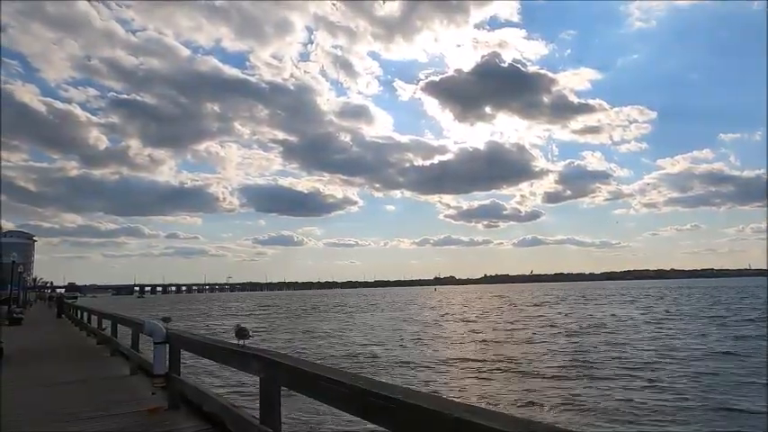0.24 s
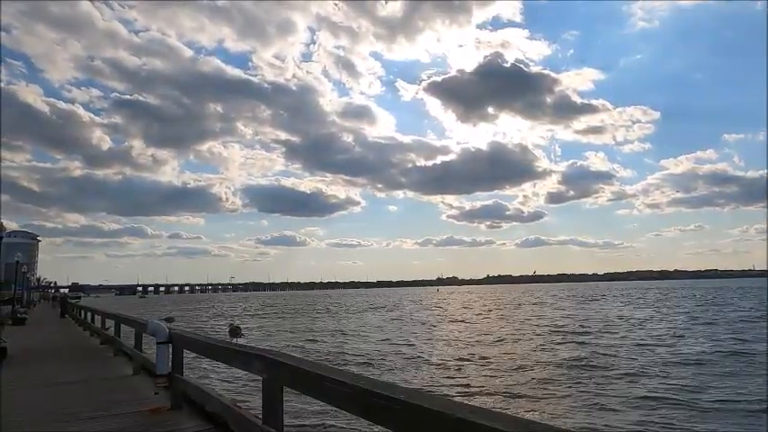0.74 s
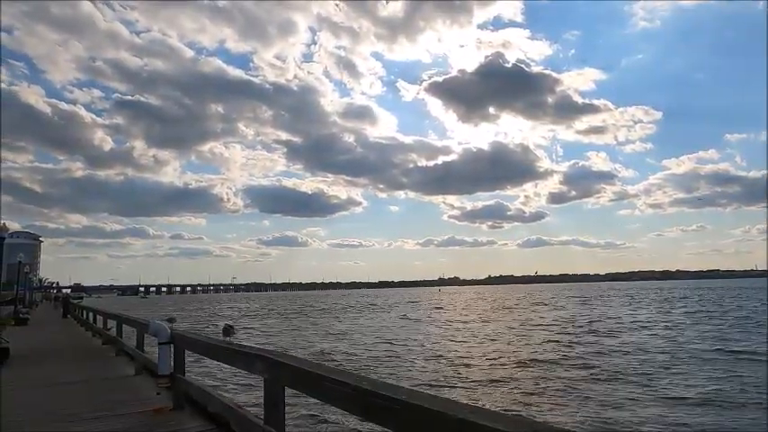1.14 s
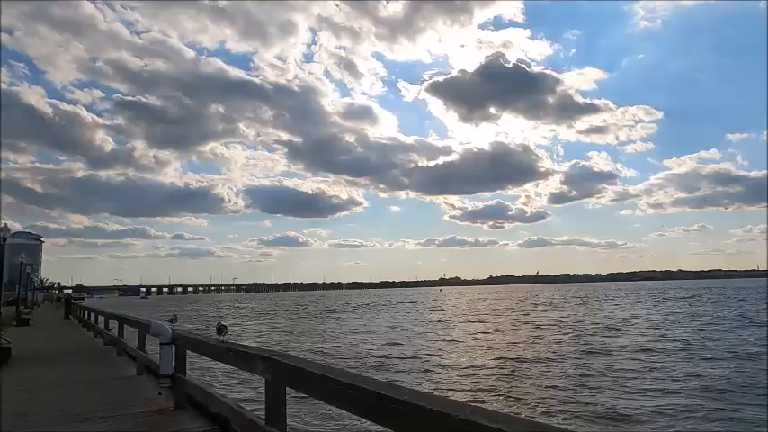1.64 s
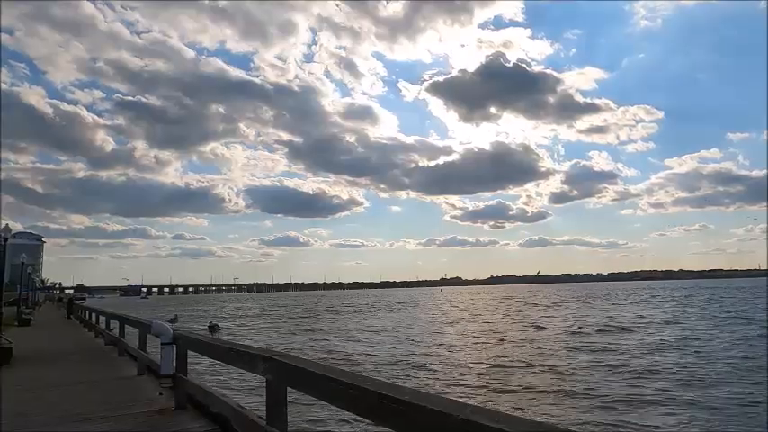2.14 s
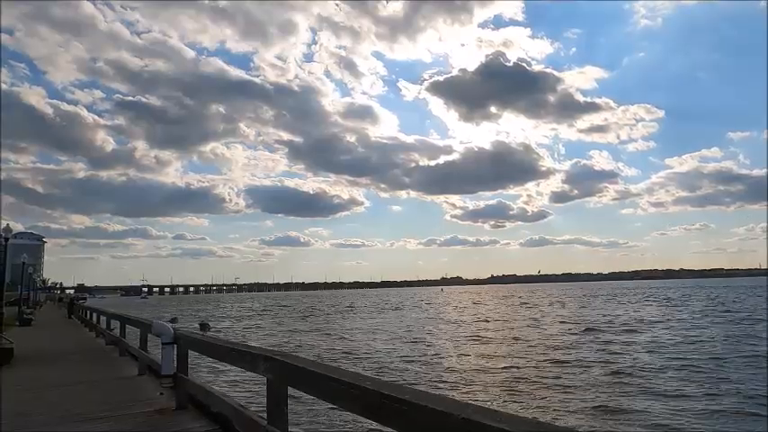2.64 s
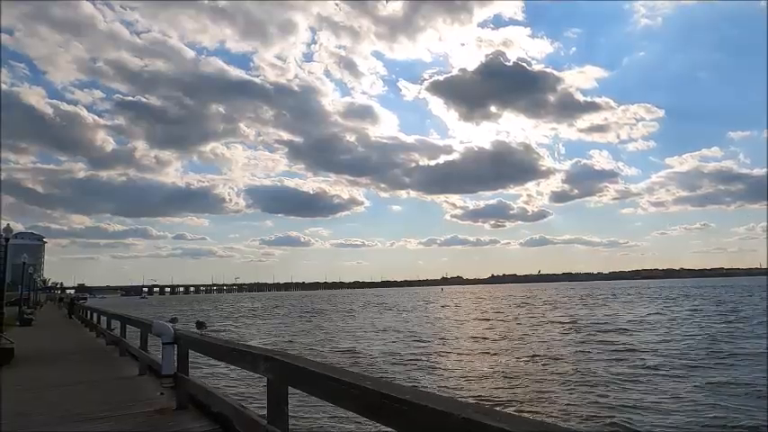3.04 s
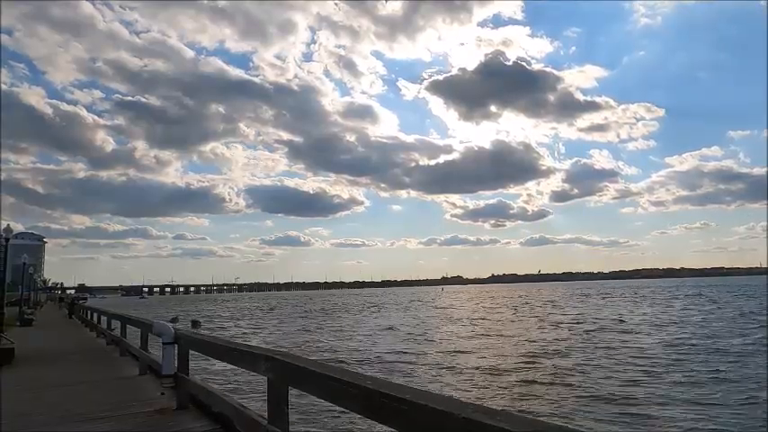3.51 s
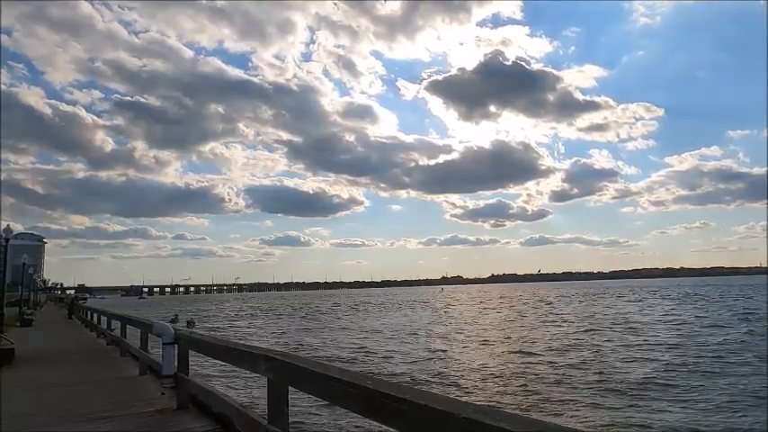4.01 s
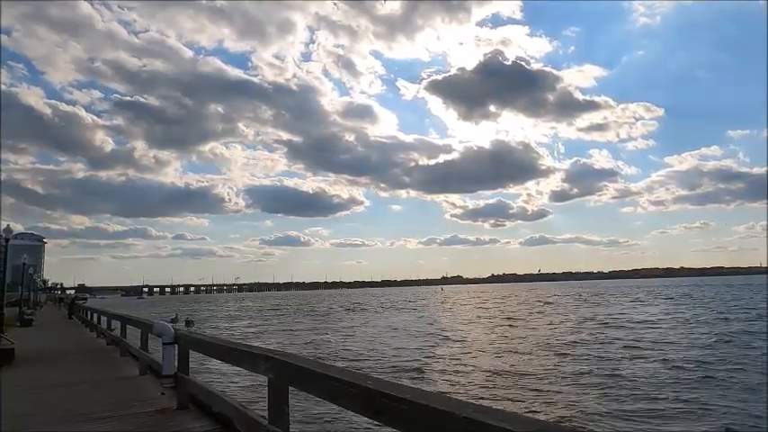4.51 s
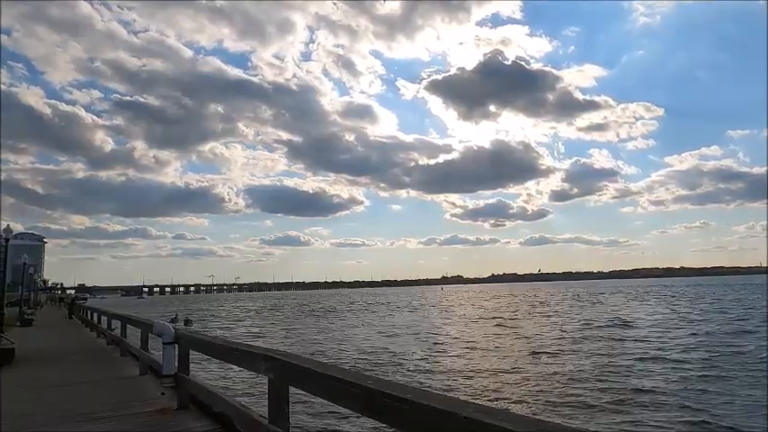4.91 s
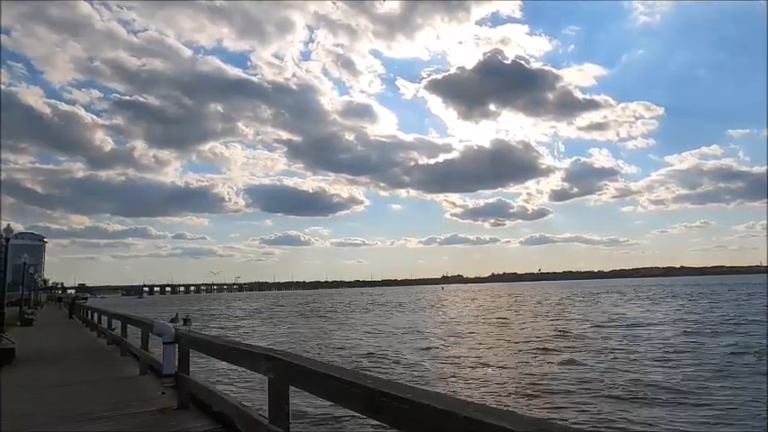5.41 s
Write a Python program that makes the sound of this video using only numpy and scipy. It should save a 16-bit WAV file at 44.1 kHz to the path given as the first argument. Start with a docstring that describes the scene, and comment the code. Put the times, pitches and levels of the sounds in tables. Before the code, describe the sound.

A windy waterfront heard through one microphone, lasting about 5.7 seconds. A gull note is already sounding at the start, nearly level, then drooping away by 0.2 s. From 0.45 to 0.75 s a second cry leaps upward, turns briefly rough and slides down. A third, hoarser and overlapping group comes at 1.45-1.8 s, and a final clearer cry falls from 3.25 to 3.6 s. Each gets quick reflections from shore buildings and a fading wash over the water. Water laps as a soft, steady hiss, with tiny rising drips around 1.1-1.25, 2, 2.4-2.55 and 2.9 s. Faint small birds whistle occasionally, then more often from 4.1 s onward. A wavering low engine hum stays distant. Wind rumbles throughout, with a sharp thump at 0.7 s, bumps near 2.5 s and denser, fluttering gusts from 3.6 to 5 s, easing slightly before the end.

```python
"""Gulls crying by a windy pier

Gulls cry in arched notes that break in pitch: harmonics shaped by a throat, some hoarse or period-doubled.
Small birds whistle far off as bending sine tones, and buildings on the shore answer all the birds.
Water laps in a bed of coloured noise, whose finer hiss also rises with the cries' reverberation, and drips
as short rising tones; a distant engine hums as a wavering sine.
Gusty wind buffets the single microphone with low noise and a quicker flutter."""
import sys
import numpy as np
from scipy import signal
from scipy.fft import rfft, irfft, next_fast_len
from scipy.io import wavfile
from scipy.ndimage import uniform_filter1d, map_coordinates

SR = 44100
rng = np.random.default_rng(int(sys.argv[2]) if len(sys.argv) > 2 else 0)


def int16_out(signal):
    """Quantize to a 16-bit WAV file."""
    q = np.round(np.clip(np.atleast_2d(signal).T, -1, 1) * 32767)
    wavfile.write(sys.argv[1], SR, q.astype(np.int16))


N = 249589  # length of the scene in samples

# Gull notes, one list of points each; the last is a wall's echo of how the first cry began.
# Columns: time_s [s], pitch_hz [Hz], second_harmonic_db [dB]
GULL_NOTES = [
    [(0, 908, -37), (0.012, 930, -35.5), (0.025, 940, -36.5), (0.037, 974, -38), (0.08, 972.4, -39),
     (0.125, 974.4, -38), (0.15, 940, -41.5), (0.17, 877, -45), (0.19, 768, -49), (0.2, 720, -62)],
    [(0.45, 730, -56), (0.465, 722, -51), (0.476, 866, -48), (0.478, 1040, -38), (0.482, 1100, -38),
     (0.49, 1142, -37.5), (0.512, 1140, -36)],
    [(0.511, 1147, -41), (0.53, 1151, -41), (0.57, 1118, -41), (0.591, 1060, -36.5)],
    [(0.59, 1016, -32.5), (0.605, 1002, -36), (0.622, 1025, -35.5), (0.64, 991, -38.5), (0.692, 947, -40),
     (0.706, 867, -45), (0.72, 861, -42.5), (0.74, 810, -48), (0.765, 760, -68)],
    [(1.452, 900, -51.5), (1.465, 850, -50), (1.475, 1045, -37.5), (1.49, 1113, -40), (1.51, 1134, -37.5),
     (1.545, 1071, -35), (1.556, 1070, -35)],
    [(1.556, 1112, -41), (1.575, 1135, -47), (1.595, 1063, -49), (1.615, 1020, -65)],
    [(1.55, 813, -53), (1.565, 842, -50), (1.582, 910, -39.5), (1.6, 879, -35.5), (1.63, 830, -39),
     (1.66, 805, -43), (1.715, 730, -50.5)],
    [(1.716, 808, -49), (1.73, 833, -46.5), (1.755, 848, -48.5), (1.8, 730, -55.5)],
    [(3.24, 944, -49.5), (3.255, 970, -45.5), (3.275, 1082, -38.5), (3.295, 1072, -38), (3.32, 1021, -35),
     (3.35, 995, -38), (3.43, 948, -43.5), (3.44, 871, -42), (3.51, 821, -49), (3.55, 847, -48.5),
     (3.595, 763, -60)],
    [(1.63, 942, -47), (1.69, 948, -52), (1.712, 1010, -47.5), (1.722, 890, -48)],
    [(0.022, 926, -56), (0.04, 926, -50), (0.085, 926, -52), (0.11, 926, -60)],
]
# The voice of each gull note, in the same order. Columns: fundamental_db [dB], other_odd_harmonics_db [dB],
# half_pitch_lines_db [dB], rasp_db [dB], tilt_db [dB per harmonic], breath_db [dB, relative to the note]
GULL_VOICES = [(-1.5, 1, -8, -48, 1.1, -24), (-0.5, 3.5, -42, -42, 1.3, -26), (4, 4, -8, -9, 1.7, -17),
               (2.5, -1.5, -19, -41, 1.4, -22), (3.5, 1.5, -37, -45, 1.4, -35), (12, 9.5, -4, -6, 1.5, -18),
               (-25, -6, -31, -23, .5, -24), (-8.5, -2, -20, -13, 0, -29), (5, -0.5, -45, -39, 1.9, -24),
               (4, -18, -26, -3, -2, -30), (-11, 4, 7, -56, 1.4, -44)]
# How the walls colour an echo, strongest in the upper treble. Columns: frequency_hz [Hz], gain_db [dB]
WALL_COLOUR = [(1500, -4), (3000, 0), (4500, 3), (5700, 11), (6500, 14), (7500, 4), (12000, 0)]


def amp(db):
    """Turn decibels into gain."""
    return 10 ** (np.asarray(db) / 20)


def unit(x):
    """Scale a sound to an average (rms) level of 1."""
    return x / np.sqrt(np.mean(x ** 2) + 1e-20)


def along(points, hz):
    """Read a curve of (Hz, value) points at any frequency, on a log frequency axis."""
    point_hz, values = np.transpose(points)
    return np.interp(np.log(hz + 1), np.log(point_hz + 1), values)


def curves(rows):
    """Return the sample numbers that the rows span, then each column joined by straight lines over them."""
    times_s, *columns = np.transpose(rows)
    first = max(0, round(times_s[0] * SR))
    last = min(N, round(times_s[-1] * SR))
    n = np.arange(first, last)
    return [n] + [np.interp(n / SR, times_s, column) for column in columns]


def held(curve):
    """Hold a curve's last value until the scene ends."""
    return np.pad(curve, (0, N - len(curve)), "edge")


def fade(n, edge_s):
    """Give a note soft ends, so that it does not click."""
    k = np.arange(len(n)) / SR
    return np.clip(np.minimum(k, k[::-1]) / edge_s, 0, 1)


def wobble(rate, size=N):
    """Make a smooth random curve with this many random points a second."""
    knots = rng.standard_normal(int(size * rate / SR) + 4)
    return map_coordinates(knots, [np.arange(size) * rate / SR])


def filtered(x, response):
    """Multiply the spectrum of x by a gain that depends on frequency."""
    m = next_fast_len(N + SR // 2)
    return irfft(rfft(x, m) * response(np.fft.rfftfreq(m, 1 / SR)), m)[..., :N]


def rush(spectrum, patchy_db):
    """Make noise of average level 1, with patches of random gain in time and pitch, then coloured."""
    z = signal.stft(rng.standard_normal(N + 2048), nperseg=512)[2]
    patches = uniform_filter1d(rng.standard_normal(z.shape), size=6, axis=0)
    patches = uniform_filter1d(patches, size=10, axis=1)
    noise = signal.istft(z * amp(patchy_db * unit(patches)), nperseg=512)[1][512:][:N]
    return unit(filtered(noise, lambda hz: amp(along(spectrum, hz))))


def gulls():
    """A throat shapes a stack of harmonics; a hoarse voice adds unsteady lines at sixths of the pitch."""
    # Resonances of the gull's throat. Columns: frequency_hz [Hz], gain_db [dB]
    throat = [(400, -35.5), (800, -9), (1150, -12.5), (1700, 3), (2200, 2), (2600, -14.5), (3000, -5),
              (3400, -14), (4200, -15.5), (5300, -24), (5900, -30), (6350, -43), (6900, -33), (8250, -33),
              (8850, -48), (9400, -53), (11200, -58), (12200, -65), (15000, -78.5)]
    out = np.zeros(N)
    sixth = np.arange(2, 80)[:, None]
    k = sixth / 6  # each line's frequency as a multiple of the pitch
    harmonic = k % 1 == 0
    off_harmonic = sixth % 3 > 0  # the rasp lines: neither harmonics nor half-pitch lines
    for rows, (first_db, odd_db, half_db, rasp_db, tilt_db, _) in zip(GULL_NOTES, GULL_VOICES):
        n, hz, db = curves(rows)
        clear = rasp_db < -26  # a voice with little rasp
        phase = 2 * np.pi * np.cumsum(hz * (1 + 0.0011 * wobble(85.5, size=len(n)))) / SR

        below_peak_db = db - db.max()
        tilt_db = tilt_db + 0.25 * below_peak_db  # less effort, duller voice
        weak_db = 0.18 * below_peak_db  # and fainter odd harmonics
        kind_db = np.select([k == 1, k % 2 == 0, harmonic, sixth % 3 == 0],
                            [first_db, 0, odd_db + weak_db, half_db], rasp_db)
        # the throat's gain counts from the second harmonic, whose level the note gives
        levels = along(throat, k * hz) - along(throat, 2 * hz)
        levels = levels + kind_db + tilt_db * np.maximum(k - 2, 0)
        # the rasp gathers just below each harmonic
        levels = levels - 11 * (k % 1 < .4) * (k % 1 > 0)
        # the rasp grows stronger towards the treble
        levels = levels + 1.5 * np.maximum(k - 2, 0) * off_harmonic
        # half-pitch lines of a clear voice thin out upward, most in the middle
        thinning_db = np.clip(8 * (k - 2.5), 0, 11) * np.where(k < 5, 1, .5)
        levels = levels - thinning_db * (sixth % 6 == 3) * clear
        # hoarseness swallows the upper harmonics
        levels = levels - 3 * (k >= 4) * harmonic * (rasp_db > -16)
        # the echo comes coloured by its wall
        levels = levels + along(WALL_COLOUR, k * hz) * (rows is GULL_NOTES[-1])
        # a tiring clear voice turns hoarse
        levels = levels - 1.2 * below_peak_db * off_harmonic * (k < 4) * clear
        # the beak opens after the onset and lets the treble out, except in a cry already under way
        still_shut = amp(-60 * np.arange(len(n)) / SR / 0.17)
        levels = levels - 5 * still_shut * np.maximum(k - 4, 0) * clear * (n[0] > 0)

        # rasp lines come and go; harmonics break up more the higher they are and the hoarser the voice
        drift = wobble(200, size=len(k) * len(n)).reshape(len(k), -1)
        loose = np.clip((0.03 + 0.12 * amp(rasp_db)) * (k - 1), 0, 1)
        loose = np.where(off_harmonic, np.clip(.55 * k, 0, 1), loose)
        size = np.sqrt(1 - loose ** 2) + loose * drift
        lines = np.sin(k * phase + rng.uniform(0, 2 * np.pi, k.shape))
        tone = np.sum(size * amp(levels) * lines, axis=0)
        out[n] += np.sqrt(2) * amp(db) * fade(n, edge_s=.0025) * tone
    return out


def breath():
    """Air hisses past the throat, louder as the gull cries harder."""
    # Colour of a gull's breath. Columns: frequency_hz [Hz], level_db [dB per Hz, relative]
    breath_colour = [(900, -48), (1600, -14), (2400, -6), (4000, -3), (5600, -10.5), (6350, -14),
                     (8200, -19.5), (10500, -31), (13500, -46.5), (22000, -120)]
    effort = np.zeros(N)
    for rows, voice in zip(GULL_NOTES, GULL_VOICES):
        n, hz, db = curves(rows)
        effort[n] += amp(db + voice[-1]) * fade(n, edge_s=.005)
    return effort * rush(breath_colour, patchy_db=3)


def small_birds():
    """Thin whistles, some with a clear octave, bend through three pitches and waver over the distance."""
    # Far bird notes. Columns: start_s [s], length_s [s], first_hz [Hz], middle_hz [Hz], last_hz [Hz],
    # first_db [dB], last_db [dB], octave_db [dB, relative to the note], waver [share of the pitch]
    whistles = [(1.24, 0.059, 2700, 2640, 2750, -60, -68, -39, .008),
                (1.875, 0.063, 2375, 2120, 2030, -58, -57, -47, 0.008),
                (3.01, 0.095, 4320, 4554, 4900, -74, -76, -45, 0.008),
                (3.125, 0.054, 2820, 2780, 2725, -58, -54.5, -12, .005),
                (3.577, 0.11, 3610, 3620, 3450, -58.5, -56.5, -37, 0.0098),
                (3.682, 0.037, 2550, 2520, 2430, -55, -67, -10, 0.006),
                (4.135, 0.14, 4500, 4600, 4530, -77, -71.5, -41, 0.007),
                (4.275, 0.125, 4430, 4330, 4200, -73, -76, -38.5, .025),
                (4.411, 0.036, 4010, 3810, 4100, -62, -68, -39, .025),
                (4.455, .035, 4000, 3780, 3550, -67, -69, -40, .015),
                (4.492, 0.066, 3480, 3330, 3320, -67.5, -69, -37, .01),
                (4.51, 0.067, 4520, 4470, 4380, -68, -72.5, -43, 0.0098),
                (4.55, 0.1, 3350, 3370, 3360, -71, -64, -37, 0.0071),
                (5.091, 0.038, 3120, 3380, 3080, -64, -64, -40, .03),
                (5.122, 0.042, 2460, 2390, 2400, -56.5, -58, -37, .012),
                (5.158, .036, 3370, 3420, 3560, -69, -69, -30, 0.011),
                (5.2, 0.13, 4600, 4530, 4550, -79, -76, -26, 0.0033),
                (5.409, 0.055, 3490, 3420, 3330, -59.5, -60.5, -39, 0.0053),
                (5.455, 0.1, 3380, 3370, 3060, -61, -68, -36, 0.007)]
    out = np.zeros(N)
    for start_s, length_s, first, middle, last, first_db, last_db, octave_db, waver in whistles:
        n, u, db = curves([(start_s, 0, first_db), (start_s + length_s, 1, last_db)])  # u runs from 0 to 1
        bend_hz = 4 * (middle - (first + last) / 2) * u * (1 - u)
        hz = first + (last - first) * u + bend_hz
        phase = 2 * np.pi * np.cumsum(hz * (1 + waver * wobble(130, size=len(n)))) / SR
        tone = np.sin(phase) + amp(octave_db) * np.sin(2 * phase)
        level = amp(db + 2.5 * wobble(50, size=len(n)))
        out[n] += np.sqrt(2) * level * fade(n, edge_s=0.008) * tone
    return out


def shore(x):
    """Walls send back single echoes; many mixed reflections form a tail that dies at its own rate per band."""
    # Single echoes, before the wall colour. Columns: delay_s [s], level_db [dB]
    walls = [(.07, -16.5), (0.148, -31), (0.209, -24.5)]
    # How long the mixed reflections last. Columns: frequency_hz [Hz], time_to_fall_60_db_s [s]
    fading = [(500, 0.23), (2000, 0.33), (8000, 0.88)]
    far_t60_s, far_db = 1.9, -16.5  # the long answer over the water
    hz, t, z = signal.stft(rng.standard_normal(SR), SR, nperseg=256)
    near = signal.istft(z * amp(-60 * t / along(fading, hz)[:, None]), SR, nperseg=256)[1][:SR]
    far = unit(rng.standard_normal(SR)) * amp(-60 * np.arange(SR) / SR / far_t60_s)
    tail = near / np.linalg.norm(near) * amp(-13.5) + far / np.linalg.norm(far) * amp(far_db)
    diffuse = signal.fftconvolve(np.pad(x, (600, 0)), tail)[:N]  # starts 600 samples late
    echoes = sum(amp(db) * np.pad(x, (round(delay_s * SR), 0))[:N] for delay_s, db in walls)
    return filtered(echoes, lambda hz: amp(along(WALL_COLOUR, hz))) + diffuse


def drips():
    """Each drip rings as a short tone that rises in pitch, with a splash of noise."""
    # Columns: start_s [s], level_db [dB, before the onset and the gains below], starting_pitch_hz [Hz]
    drops = [(1.065, -52.5, 3680), (1.179, -54, 4180), (1.231, -46.5, 3740), (1.246, -58, 7000),
             (1.978, -55, 4620), (2.37, -55, 4250), (2.53, -58, 4540), (2.554, -58, 7000),
             (2.861, -56, 5360),]
    # Colour of the splash noise. Columns: frequency_hz [Hz], gain_db [dB]
    splash_colour = [(1500, -7), (3500, 9.5), (7000, -14), (10000, -23), (14000, -52)]
    t60_s, onset_s = 0.0096, 0.00084  # time to fall 60 dB, time constant of the rise
    t = np.arange(SR // 20) / SR
    blips, splash = np.zeros(N + SR), np.zeros(N + SR)
    for start_s, db, hz in drops:
        start = round(start_s * SR)
        shape = amp(db - 60 * t / t60_s) * (1 - np.exp(-t / onset_s))
        blips[start:][:len(t)] += 1.4 * shape * np.sin(2 * np.pi * hz * t * (1 + 15 * t))
        splash[start:][:len(t)] += 4 * shape * rng.standard_normal(len(t))
    return blips[:N] + filtered(splash[:N], lambda hz: amp(along(splash_colour, hz)))


def noise_bed():
    """Noise in three bands: a dull swell, a finer hiss that also rises with the cries' reverberation, fizz."""
    # Strength of the bed, before the small boosts below.
    # Columns: time_s [s], swell_db [dB], hiss_db [dB]
    bed = [(0, -47, -58), (.45, -50, -62.5), (.7, -46, -57), (1, -48.5, -64.5), (1.94, -47.5, -60.5),
           (3.07, -47, -63), (3.3, -46, -55), (3.6, -46.5, -57), (3.86, -48, -62), (5.66, -47, -63)]
    # Colours of the three noises. Columns: frequency_hz [Hz], level_db [dB per Hz, relative]
    swell_colour = [(130, -9.5), (220, -2), (302, -6.5), (522, -9), (825, -12), (1320, -16.5),
                    (1520, -21.5), (2500, -41.5), (3250, -42), (5500, -120)]
    hiss_colour = [(880, -40), (1500, -0.5), (2050, -2.5), (2250, -2), (3940, -8.5), (4930, -16),
                   (5510, -19), (8630, -40), (10100, -51.5), (13200, -70.5), (22000, -120)]
    fizz_colour = [(2500, -32.5), (4500, 0), (6500, -4), (8600, -9), (10200, -19), (13200, -48),
                   (22000, -120)]
    fizz_db, puff_db = -17.5, 2.7  # fizz relative to the hiss_db column, depth of its puffs
    n, swell_db, hiss_db = curves(bed)
    swell_db, hiss_db = held(swell_db), held(hiss_db)
    lap = wobble(6.7)
    swell = amp(swell_db + 0.65 + 0.5 * lap) * rush(swell_colour, patchy_db=1.68)
    hiss = amp(hiss_db + 2.0 + 0.18 * lap + 0.18 * wobble(19)) * rush(hiss_colour, patchy_db=2.0)
    fizz = amp(hiss_db + fizz_db + puff_db * wobble(25)) * rush(fizz_colour, patchy_db=1.5)
    return swell + hiss + fizz


def wind():
    """Eddies thump the microphone as low noise; quicker ones flutter above them in bursts."""
    # Wind between gusts. Columns: time_s [s], buffet_db [dB], flutter_db [dB]
    calm = [(0.0, -52, -44), (0.3, -41, -41), (0.6, -34, -37.5), (0.8, -36, -41), (1.04, -46, -44.5),
            (1.25, -44.5, -46.5), (1.7, -41, -37.5), (2.11, -40.5, -42.5), (2.44, -30.5, -38),
            (2.6, -35, -39.5), (2.93, -44.5, -42.5), (3.2, -36.5, -44.5), (3.33, -40, -43),
            (4.02, -34, -35.5), (4.52, -33, -41.5), (4.87, -34, -35.5), (5.31, -41, -47.5),
            (5.66, -38.5, -36.5)]
    # Single gusts. Columns: peak_s [s], buffet_db [dB], flutter_db [dB],
    # width_s [s, how long before the peak the power is at 37 percent]
    gusts = [(.05, -38, -51, 0.015), (.39, -36, -56, 0.042), (0.628, -43, -26.5, 0.0079),
             (0.71, -21, -27, 0.01), (0.95, -48, -35.5, 0.032), (1.0, -30, -51, 0.014),
             (1.59, -39, -54, 0.055), (2.25, -44, -52, 0.017), (2.45, -35, -42, 0.02),
             (2.54, -28.5, -35, 0.016), (2.71, -32, -53, 0.078), (3.28, -30, -53, 0.031),
             (3.608, -26.5, -46, 0.035), (3.75, -31, -52, 0.018), (3.96, -26, -31, 0.044),
             (4.204, -25.5, -22.5, 0.023), (4.393, -30.5, -27.5, 0.019), (4.461, -29.5, -26, 0.021),
             (4.7, -28.5, -34, 0.012), (4.791, -26, -58, 0.019), (4.85, -29.5, -33, 0.032),
             (5.0, -30, -44, 0.082), (5.219, -36.5, -51, 0.028), (5.551, -37, -35.5, 0.024)]
    # Colours of the two noises. Columns: frequency_hz [Hz], level_db [dB per Hz, relative]
    buffet_colour = [(8.8, -37.5), (15, -2.5), (38, 3.5), (90, -10), (120, -36.5), (200, -120)]
    flutter_colour = [(38, -40), (65, -1.5), (94, -2.5), (140, -5.5), (211, -10.5), (247, -18.5),
                      (420, -26.5), (550, -44), (920, -120)]
    fall_over_rise = 0.98  # a gust leaves slightly faster than it comes
    n, *calm_db = curves(calm)
    power = amp([2 * held(c) for c in calm_db])  # doubled decibels give power
    for peak_s, *peak_db, width_s in gusts:
        t = (np.arange(N) / SR - peak_s) / width_s
        bump = np.exp(-(t / np.where(t < 0, 1, fall_over_rise)) ** 2)
        power += amp(peak_db)[:, None] ** 2 * bump
    eddies = wobble(11)
    buffet = unit(amp(1.0 * eddies + 0.79 * wobble(4.0)) * rush(buffet_colour, patchy_db=-1.3))
    flutter = unit(amp(1.4 * eddies + 1.68 * wobble(45)) * rush(flutter_colour, patchy_db=1.5))
    blowing = np.sum(np.sqrt(power) * [buffet, flutter], axis=0)
    return .15 * np.tanh(blowing / .15)  # the strongest gusts saturate the capsule softly


def engine(hz=137):
    """A far engine hums as one sine, unsteady in pitch and level."""
    # Columns: time_s [s], level_db [dB, sine amplitude before the random wobble]
    hum = [(0, -47.5), (.9, -57), (1.4, -44), (2.3, -41.5), (3, -47.5), (4.8, -52), (5.2, -42), (5.66, -54)]
    n, db = curves(hum)
    phase = 2 * np.pi * np.cumsum(hz * (1 + 0.02 * wobble(5.9))) / SR
    return amp(held(db) + 0.73 * wobble(8.2)) * np.sin(phase)


def scene():
    """Mix the birds and their echoes with drips, noise bed, wind and engine, in one channel."""
    birds = gulls() + breath() + small_birds()
    return (birds + shore(birds) + drips() + noise_bed() + wind() + engine())[None]


def record(dry):
    """Nothing sounds above 14 kHz, save a straight line from first to last sample; the end is soft."""
    top_hz = 14000
    drift = np.linspace(dry[:, 0], dry[:, -1], N, axis=1)
    kept = drift + filtered(dry - drift, lambda hz: hz < top_hz)
    left_s = np.arange(N)[::-1] / SR
    return kept * np.sin(np.pi / 2 * np.clip(left_s / .008, 0, 1)) ** 2


dry = scene()
out = record(dry)
int16_out(out)
```